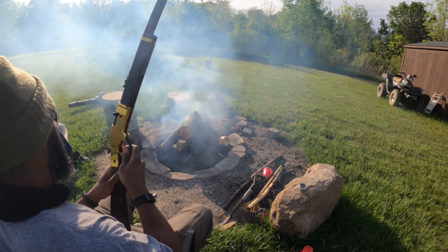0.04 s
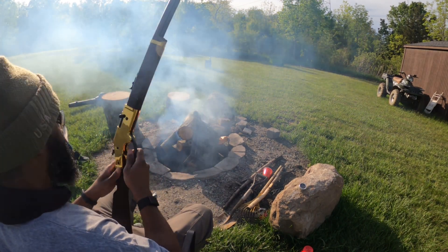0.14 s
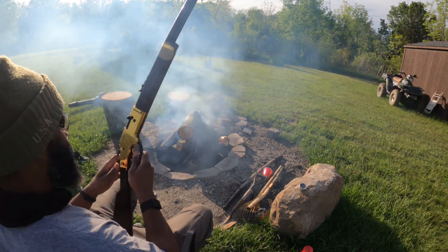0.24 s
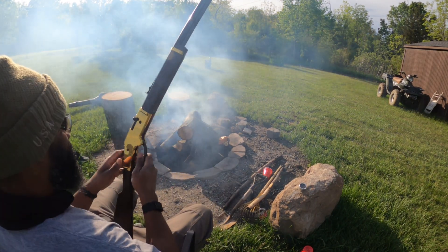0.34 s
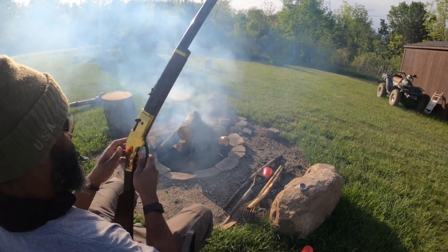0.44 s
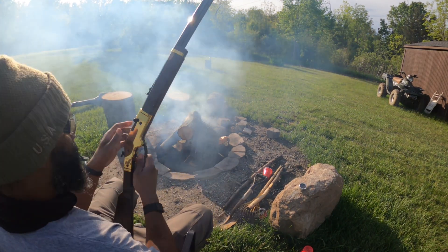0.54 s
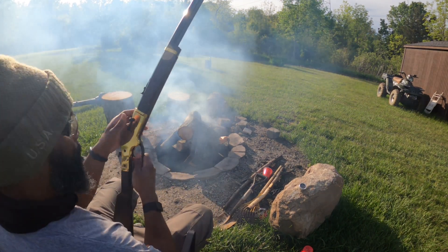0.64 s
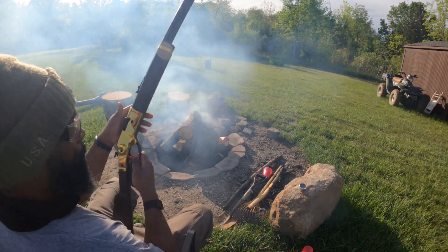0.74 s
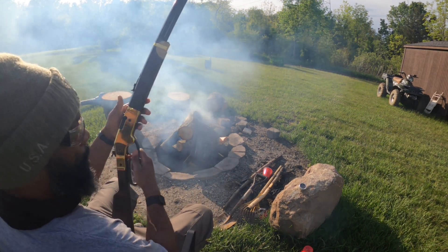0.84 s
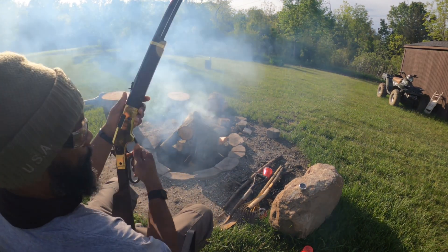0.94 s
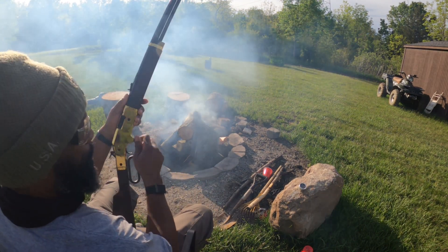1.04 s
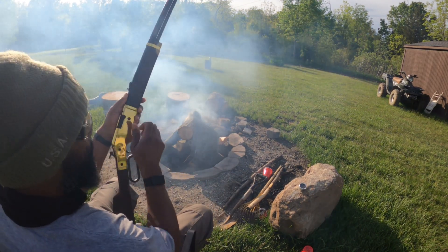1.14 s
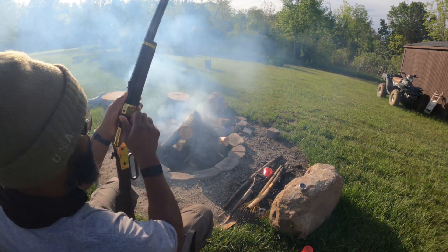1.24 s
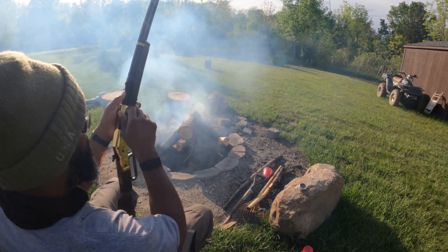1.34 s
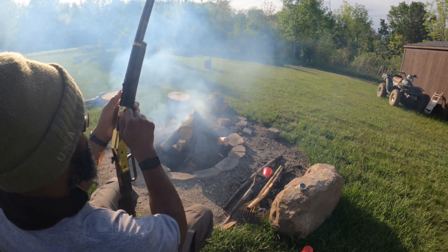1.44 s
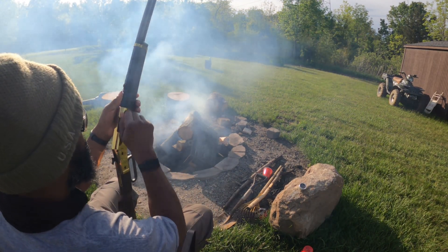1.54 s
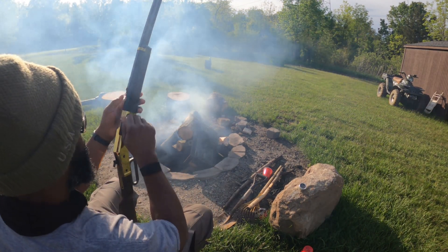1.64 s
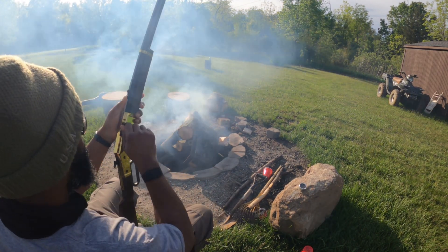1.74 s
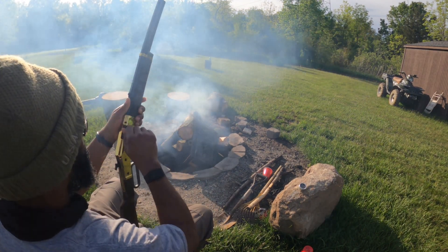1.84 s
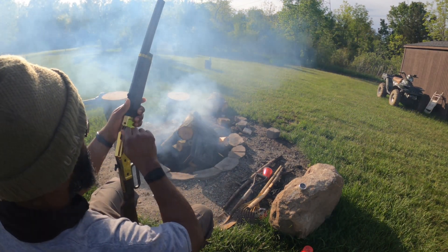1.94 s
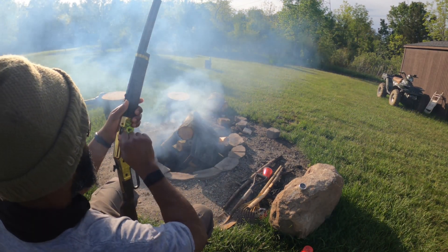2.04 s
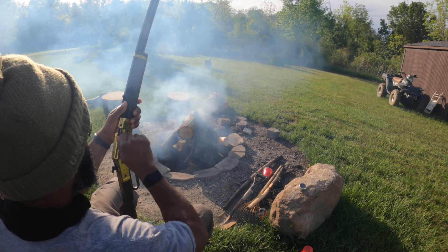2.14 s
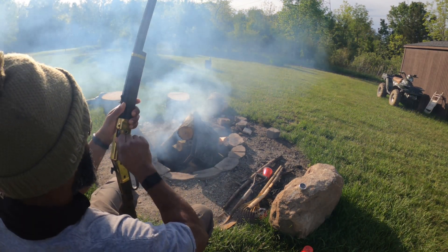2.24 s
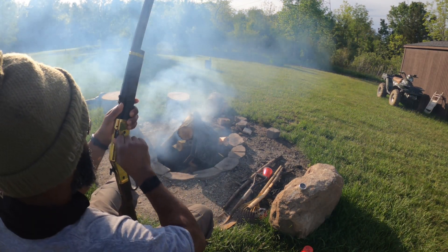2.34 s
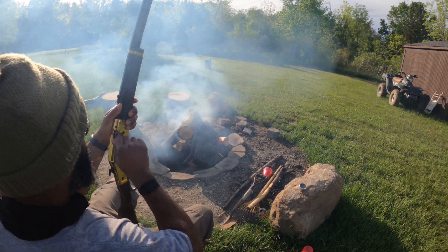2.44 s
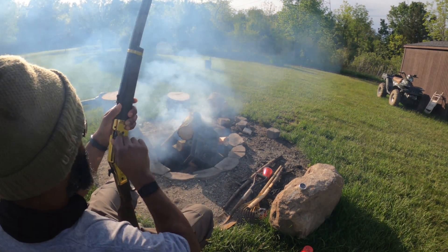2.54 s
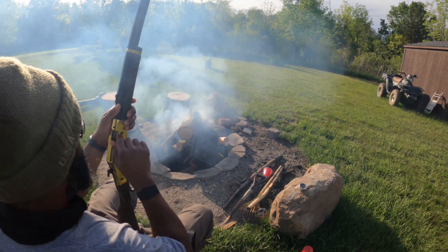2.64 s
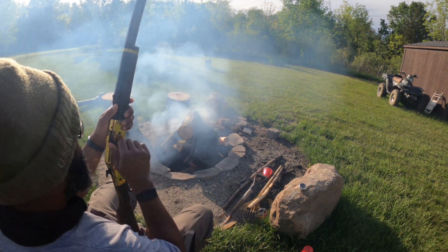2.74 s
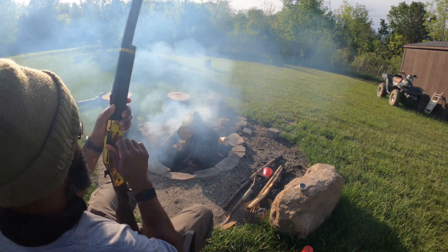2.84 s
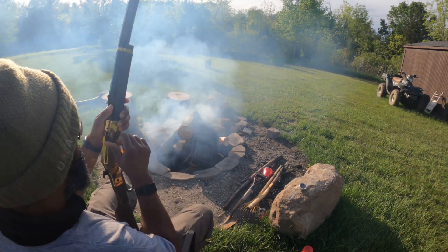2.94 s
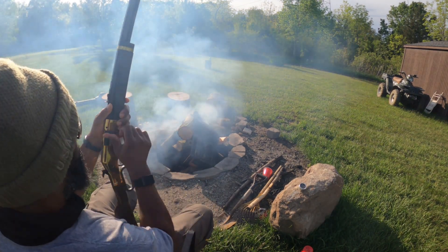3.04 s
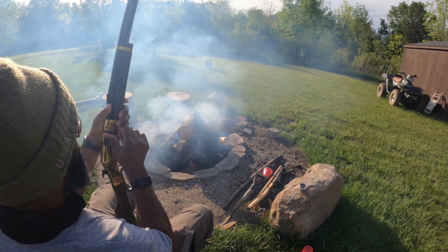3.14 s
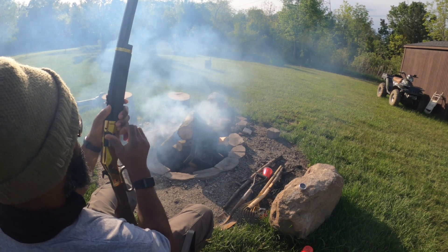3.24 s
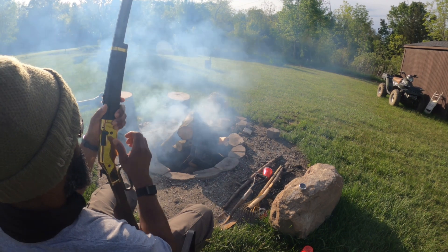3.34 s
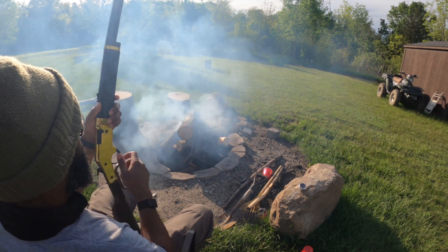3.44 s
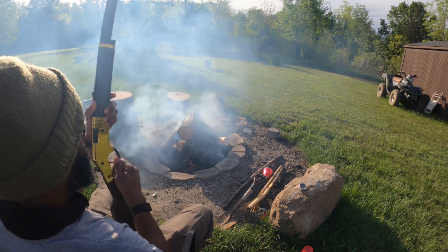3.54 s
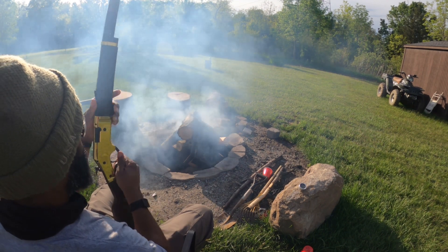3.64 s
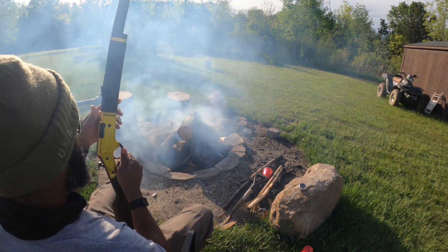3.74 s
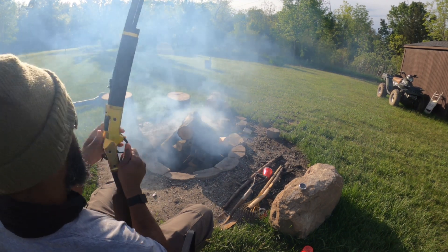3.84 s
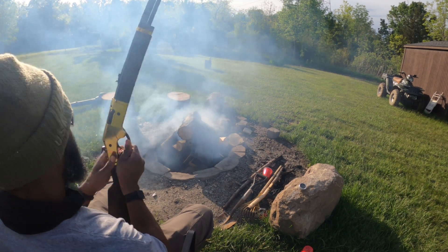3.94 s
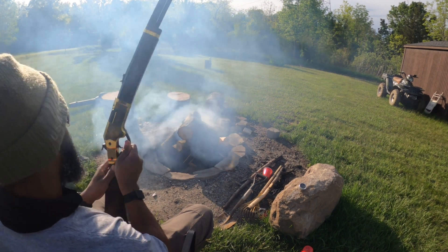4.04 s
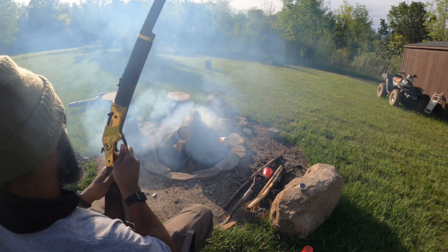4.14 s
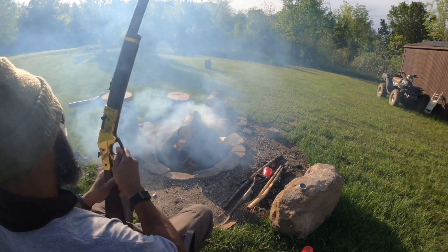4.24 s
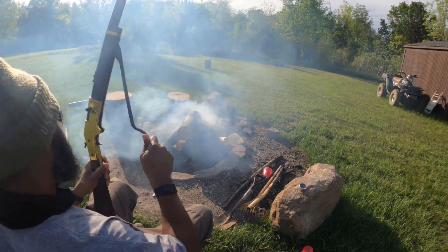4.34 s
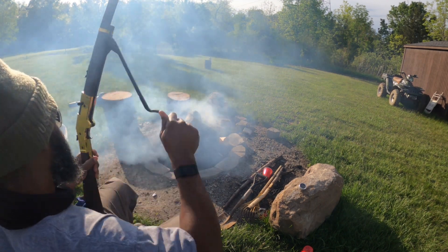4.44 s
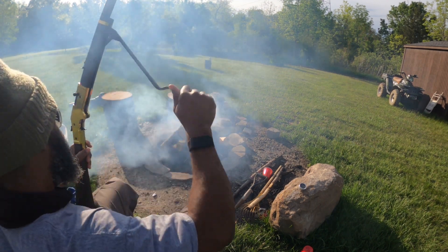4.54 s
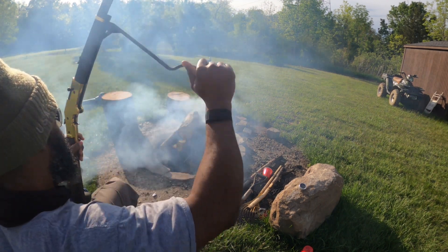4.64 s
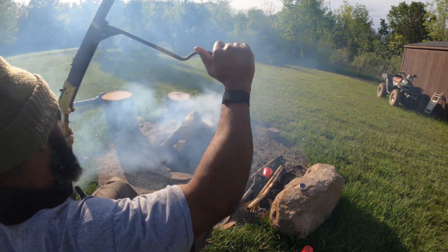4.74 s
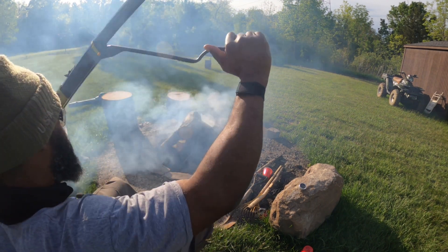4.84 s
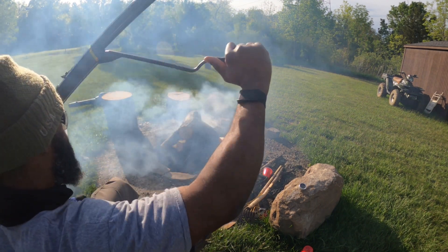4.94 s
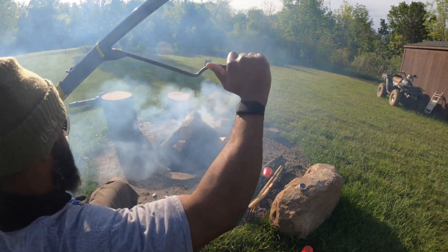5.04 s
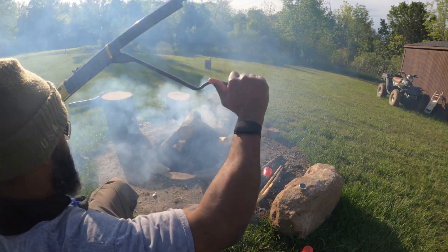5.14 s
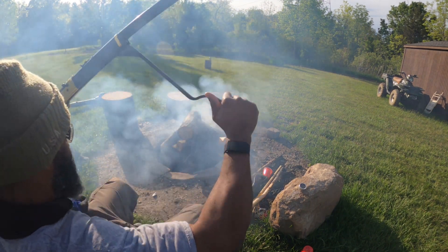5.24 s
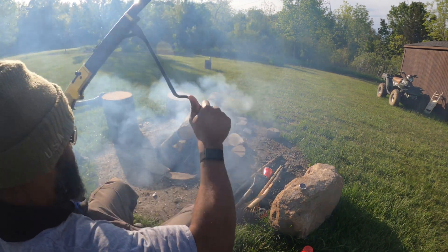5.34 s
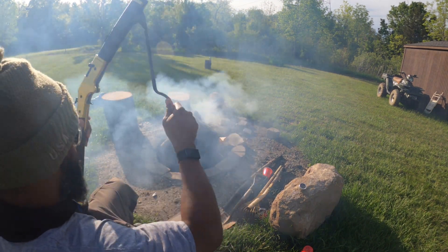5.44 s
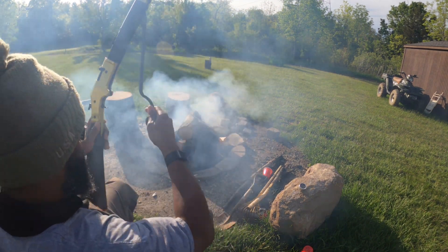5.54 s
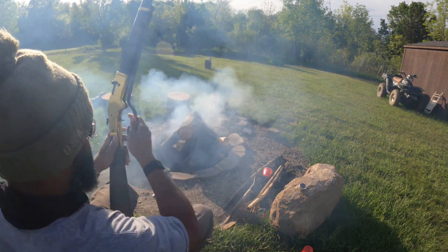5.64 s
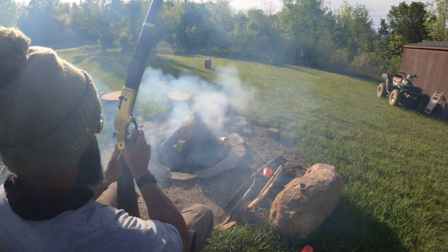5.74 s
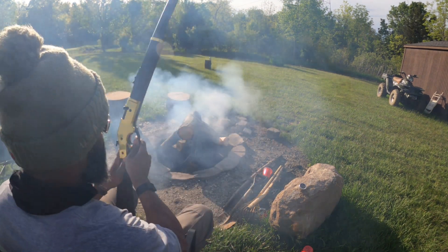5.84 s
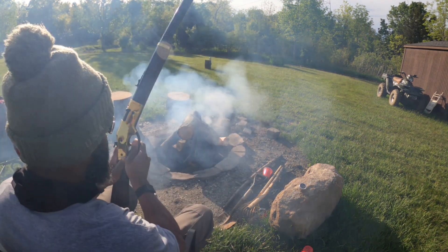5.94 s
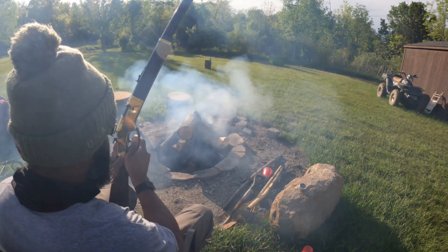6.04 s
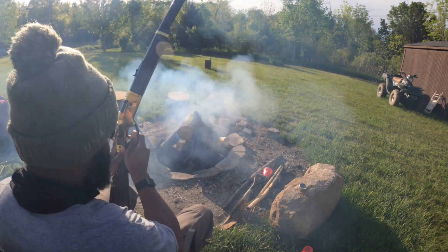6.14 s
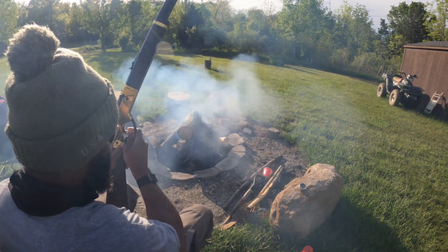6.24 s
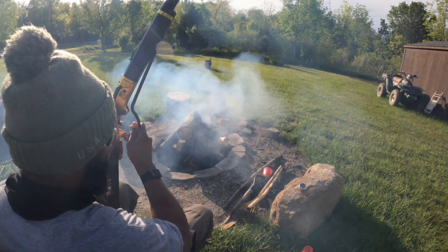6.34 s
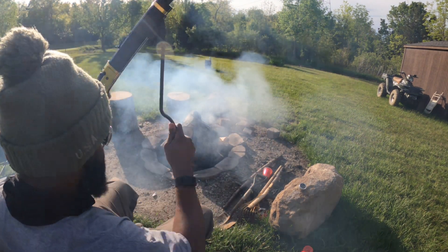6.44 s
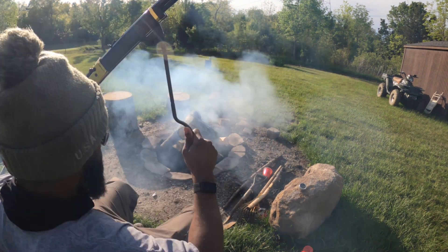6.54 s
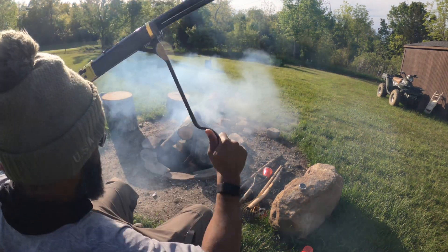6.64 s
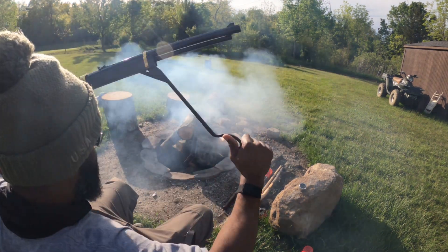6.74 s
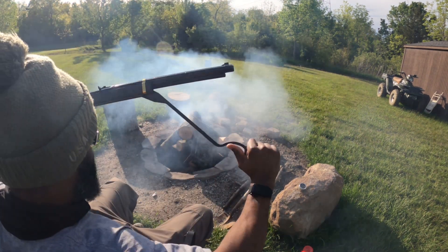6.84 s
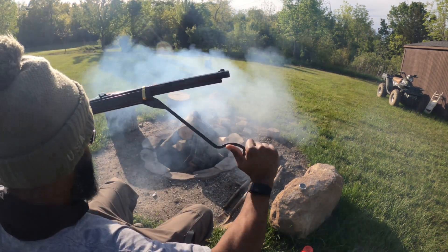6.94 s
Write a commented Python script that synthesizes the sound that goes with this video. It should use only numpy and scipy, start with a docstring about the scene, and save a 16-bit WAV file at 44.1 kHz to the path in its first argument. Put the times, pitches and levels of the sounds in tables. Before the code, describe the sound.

Quiet open lawn with soft low wind on the microphone and distant chirping birds. Very near, hands rub a wooden stock and steel parts tick, scrape and snap in separate bursts. A lever unlatches with a rattle, clacks, and cloth brushes past. A sharp dry crack with a short low air pulse is the loudest event; afterwards, lighter clacks and scrapes as the rifle is cocked again.

```python
"""Lever-action air rifle on a lawn

A lever-action air rifle is loaded, cocked, fired and cocked again close to a camera.
Latches and pump lever clack as noise-struck bodies with ringing modes; the shot adds one low air pulse.
Diffuse noise tails return the gun from the ground and tree line. Shaped noise makes the rubbing hands
and sleeve and the light wind on the microphone; gliding whistles make songbirds far off."""
import sys
import numpy as np
from scipy import signal
from scipy.fft import rfft, irfft, next_fast_len
from scipy.io import wavfile
from scipy.ndimage import uniform_filter1d, map_coordinates

SR = 44100
rng = np.random.default_rng(int(sys.argv[2]) if len(sys.argv) > 2 else 0)


def output_pcm(signal):
    """Save a mono or channel-first signal as 16-bit PCM at the path in sys.argv[1].

    Samples are clipped to [-1, 1] before scaling.
    """
    pcm = np.clip(np.atleast_2d(signal).T, -1, 1) * 32767
    wavfile.write(sys.argv[1], SR, np.round(pcm).astype(np.int16))


N = 308700
TIME = np.arange(N) / SR
AFTER = np.arange(SR // 5) / SR  # seconds since a contact

# wind rumble: time_s, level_db
WIND_LEVEL = [(0, -49.5), (2.6, -52.5), (6.5, -50)]
# wind rumble spectrum: freq_hz, level_db
RUMBLE_SPECTRUM = [(20, -15.5), (55, 2.5), (130, 0.5), (210, -7.5), (330, -21), (800, -62)]
# distant air spectrum: freq_hz, level_db
FIELD_SPECTRUM = [(350, 3.5), (1100, 6), (1700, -8), (2600, -7), (4000, -23.5), (15000, -53.5)]
# sleeve strokes as the arm reaches or works the lever: middle_s, length_s, level_db
SLEEVE_STROKES = [(1.0, 1, -71.5), (1.622, 0.31, -67.5), (3.7, 0.43, -73), (4.48, 0.77, -64),
                  (4.87, 0.31, -63), (5.382, 0.44, -68), (5.849, 0.39, -57), (6.715, 0.38, -66)]
# cloth spectrum: freq_hz, level_db
CLOTH_SPECTRUM = [(400, -12), (1200, 7), (3000, 2.5), (7300, -5), (15500, -37)]
# spring and linkage rattles: start_s, length_s, first_tick_db
RATTLES = [(0.0018, 0.047, -40.5), (0.077, 0.019, -40.5), (0.124, 0.058, -53.5), (1.798, 0.061, -50),
           (2.119, 0.064, -46), (2.967, 0.1, -45), (4.038, 0.048, -56.5), (4.4085, 0.011, -46.5),
           (4.4458, 0.052, -36.5), (4.4708, 0.034, -35.5), (4.529, 0.008, -52), (4.94, 0.068, -49),
           (6.806, 0.008, -58)]
# near bird's syllables: start_s, length_s, level_db, glide_pitches_hz
SYLLABLES = [(0.31, 0.11, -74.5, (2520, 2500)), (0.437, 0.118, -61.5, (3400, 2520, 3250)),
             (0.797, 0.045, -65.5, (3500, 1800)), (0.912, 0.09, -67.5, (2250, 2170, 2550)),
             (1.026, 0.089, -63, (2040, 2530, 3500)), (1.193, 0.056, -66, (3500, 3340, 3040)),
             (1.3, 0.09, -65.5, (2500, 2630, 3250)), (1.39, 0.045, -64, (2470, 2330)),
             (1.538, 0.053, -64, (3240, 3520)), (1.586, 0.12, -66, (3350, 2950, 2990, 2200)),
             (1.874, 0.05, -65.5, (3200, 1900)), (2.277, 0.045, -69.5, (2450, 3300)),
             (2.355, 0.083, -65.5, (3400, 2460, 3250)), (3.551, 0.12, -72, (2600, 1920)),
             (3.73, 0.099, -76, (3200, 3350)), (3.911, 0.077, -67.5, (3430, 2950)),
             (4.646, 0.08, -67.5, (2600, 2790, 2560)), (5.248, 0.24, -72, (2300, 2740, 2200))]
# palm rubs on the wooden stock: start_s, fall_s, level_db
PALM_RUBS = [(0.438, 0.59, -64), (1.663, 0.08, -59.5), (2.476, 0.043, -50), (2.905, 0.031, -55),
             (3.946, 0.14, -60), (5.07, 0.029, -55)]
# taps of small steel parts: start_s, pitch_hz, level_db
CLINKS = [(1.096, 3400, -56.5), (1.938, 4080, -57), (2.989, 4090, -37), (3.188, 4150, -62),
          (5.758, 3080, -53)]
# blows of breech, lever and piston: start_s, knock_pitch_hz, strength_db,
# hardness_db (high = steel snap, low = wooden knock)
BLOWS = [(1.7434, 1560, -57.5, -10.5), (1.757, 1370, -33.5, 0), (1.7729, 1400, -24, 2),
         (1.7755, 1285, -27.5, 4.5), (2.0056, 1550, -34, 2.5), (2.036, 1610, -39, 3),
         (2.0763, 1250, -21, 0.5), (2.6002, 1160, -39, -7), (2.627, 1374, -49.5, -10),
         (3.0142, 1960, -36, 5), (3.0341, 1268, -32, -9), (3.0396, 1690, -22.5, 2.5),
         (3.0566, 1630, -29.5, -2.5), (4.2683, 1847, -39, 3), (4.307, 1136, -23.5, -3.5),
         (4.3705, 1350, -39.5, 8.5), (4.388, 1490, -37, -2), (4.8986, 1940, -29.5, 2),
         (4.937, 1470, -37.5, 1.5), (5.72, 1072, -17, 6.5), (5.7265, 1230, -14, 4),
         (6.3758, 2070, -31.5, -2.5), (6.3762, 3030, -36, -4), (6.4485, 1410, -35, 3),
         (6.4808, 1520, -43, -7), (6.8573, 1357, -33.5, -3), (6.8902, 1710, -49.5, -7),
         (6.933, 1415, -57, -5)]
# metal sliding on metal: start_s, length_s, level_db
SCRAPES = [(1.748, 0.057, -43), (2.017, 0.072, -46), (2.944, 0.13, -56.5), (4.363, 0.054, -46.5),
           (4.898, 0.027, -39), (5.702, 0.025, -42.5), (6.381, 0.14, -57.5), (6.617, 0.018, -59),
           (6.689, 0.04, -60.5), (6.766, 0.018, -60), (6.817, 0.024, -56.5), (6.851, 0.026, -46)]
# spectra of the struck bodies: freq_hz, level_db
THUD_SPECTRUM = [(60, -24), (330, -15), (620, 1.5), (900, 5), (2000, -39.5)]
STOCK_SPECTRUM = [(150, -46), (850, -15), (1080, 3.5), (2100, -3), (2900, -20), (6000, -57)]
RECEIVER_SPECTRUM = [(900, -55.5), (1700, -6), (3000, -0.5), (5000, -10.5), (7500, -43.5)]
STEEL_SPECTRUM = [(2500, -20), (4500, -1), (7600, -3), (9000, -11.5), (16000, -33.5)]
SPRING_SPECTRUM = [(600, -24.5), (2600, 0.5), (3700, 5.5), (7600, -3.5), (9500, -15.5), (15500, -26)]
# ringing modes of the metalwork: mode_hz, level_db
METAL_MODES = [(1230, 0.5), (2020, -4.5), (2960, 4.5), (3690, -0.5), (4080, -1.5), (4810, 1), (5700, -2.5),
               (6490, -2)]
# tree line's answer: delay_s, relative_level_db
TREE_ECHO = [(0.08, -40.5), (.13, -3.5), (.24, 1.5), (0.449, -34)]

SHOT_S = 5.7295
GUST_DB, FIELD_DB = -65.5, -65.5
RESTING_CLOTH_DB = -80.5  # between strokes
CONTACT_RISE_S = 0.0007  # build-up of contact force
TICK_GAP_MEDIAN_S, RATTLE_FALL_DB = 0.008, 19.5  # fall over a rattle's length
FAR_BIRDS_DB, FAR_LOWER_MAX = -77.5, 0.22  # far pitches drop by up to this share
RUB_ATTACK_S = 0.0086
CLINK_OVERTONE_RATIO = 1.2
CLACK_DB, SNAP_DB = -2.5, -11.5  # receiver and steel against a blow's strength
LEAD_IN_S, LEAD_IN_DB = 0.0035, -25  # faint copy just ahead of each blow, softening its attack
REBOUND_MEDIAN_S, REBOUND_DB = 0.009, -17.5  # part springs back and lands again
GRIP_UNTIL_S = 4.0
GRIPPED_THUD_DB, FREE_THUD_DB = -47, -15  # hand round the receiver damps the thud while loading
PART_HZ = 1480  # a part knocking here shares the metalwork's modes
DUCK_THRESHOLD_DB, RECOVERY_DB_PER_S = -22.5, 8
ROLLOFF_HZ, TOP_HZ = 14800, 15800


def amp(db):
    """Decibels to gain."""
    return 10 ** (np.asarray(db) / 20)


def unit(x):
    """x at rms 1."""
    return x / np.sqrt(np.mean(x ** 2) + 1e-20)


def along(points, hz):
    """Interpolate (freq_hz, value) points on a log frequency axis."""
    f, v = np.transpose(points)
    return np.interp(np.log(hz + 1), np.log(f), v)


def curve(rows, t=TIME):
    """Join (time_s, value) rows by straight lines."""
    return np.interp(t, *np.transpose(rows))


def wobble(rate_hz):
    """Smooth random curve, rate_hz knots a second."""
    knots = rng.standard_normal(int(N * rate_hz / SR) + 4)
    return map_coordinates(knots, [TIME * rate_hz])


def fade(t60):
    """Exponential decay of a struck part, 60 dB in t60 seconds."""
    return 1000 ** (-AFTER / t60)


def add(track, s, sound):
    """Mix a sound into a track from time s."""
    part = track[..., max(round(s * SR), 0):][..., :sound.shape[-1]]
    part += sound[..., :part.shape[-1]]


def filtered(x, response):
    """Multiply the spectrum of x by a response of frequency."""
    m = next_fast_len(N + SR // 2)
    hz = np.fft.rfftfreq(m, 1 / SR)
    return irfft(rfft(x, m) * response(hz), m)[..., :N]


def causal(points, size=2048):
    """Minimum-phase impulse response of a body with this spectrum, by folding its cepstrum."""
    hz = np.fft.rfftfreq(size, 1 / SR)
    cepstrum = irfft(np.log(amp(along(points, hz))))
    cepstrum[1:size // 2] *= 2
    cepstrum[size // 2 + 1:] = 0
    return irfft(np.exp(rfft(cepstrum)))


def punch(x):
    """x at rms 1 over its first 4 ms."""
    return x / np.sqrt(np.mean(x[:round(.004 * SR)] ** 2))


def contact(body, t60, tail_db, tail_t60, apart):
    """A hard contact strikes a body once, then chatters; its weak tail differs between the ports."""
    noise = rng.standard_normal((3, len(AFTER)))
    rise = 1 - np.exp(-AFTER / CONTACT_RISE_S)
    force = noise[0] * rise * fade(t60)
    force[round(CONTACT_RISE_S * SR)] += 4  # the strike
    direct = punch(signal.fftconvolve(force, body)[:len(AFTER)])
    kernel = body[None] / np.linalg.norm(body)
    mid, side = rise * signal.fftconvolve(noise[1:], kernel, axes=1)[:, :len(AFTER)]
    tail = amp(tail_db) * fade(tail_t60)
    centre = direct + mid * tail
    width = side * (apart * fade(t60) + tail / 2)
    return np.array([centre + width, centre - width])


def ring(t60, scale=1):
    """Decaying metalwork modes, newly weighted each call; a smaller part rings higher."""
    hz, db = np.transpose(METAL_MODES)[..., None]
    strength, phase_cycles = rng.standard_normal((2, len(METAL_MODES), 1))
    modes = amp(db + 2 * strength) * np.sin(2 * np.pi * (scale * hz * AFTER + phase_cycles))
    return fade(t60) * np.sum(modes, axis=0)


def rush(spectrum, side_db):
    """Stereo noise of rms 1 with a given colour and width."""
    noise = rng.standard_normal((2, N))
    mid, side = filtered(noise, lambda hz: amp(along(spectrum, hz)))
    width = amp(side_db) * side
    return unit(np.array([mid + width, mid - width]))


def echo(x, shape):
    """Diffuse scatter: a noise tail whose level follows (delay_s, relative_level_db) points."""
    t = np.arange(SR) / SR
    tail = rng.standard_normal((2, SR)) * amp(curve(shape, t)) * (t < shape[-1][0])
    return signal.fftconvolve(x[None], tail / np.linalg.norm(tail[0]), axes=1)[:, :N]


def outdoors():
    """Wind rumbles and buffets as wavering low noise over the soft rush of the open field."""
    rumble = amp(curve(WIND_LEVEL) + 1.3 * wobble(8)) * rush(RUMBLE_SPECTRUM, side_db=-15)
    # slow lumps of air on the ports
    gusts = unit(amp(4.8 * wobble(6.2)) * rush([(70, 3.0), (800, -81.5)], side_db=-8.5))
    field = rush(FIELD_SPECTRUM, side_db=-8.5)
    return rumble + amp(GUST_DB) * gusts + amp(FIELD_DB) * field


def sleeve():
    """Cloth slides over the gun in uneven noise grains; each stroke swells and ebbs."""
    motion = amp(RESTING_CLOTH_DB)
    for middle_s, length_s, db in SLEEVE_STROKES:
        motion = motion + amp(db) * np.exp(-2 * (2 * (TIME - middle_s) / length_s) ** 2)
    grain = unit(amp(2.4 * wobble(34) + 2.2 * wobble(300)))
    return motion * grain * rush(CLOTH_SPECTRUM, side_db=-5.5)


def tick(spring):
    """A light contact on the spring."""
    return contact(spring, t60=0.02, tail_db=-6.0, tail_t60=0.093, apart=0.33)


def linkage(count=11):
    """Spring and lever pivots slip in uneven runs of small bright ticks that ring and die away."""
    out = np.zeros((2, N))
    spring = causal(SPRING_SPECTRUM)
    for s, length_s, db in RATTLES:
        gaps_s = TICK_GAP_MEDIAN_S * np.exp(rng.normal(0, 0.32, count))
        ringing = amp(-15.5) * ring(t60=0.051)
        for delay_s in np.cumsum(gaps_s) - gaps_s[0]:
            if delay_s < length_s:
                level = amp(db - RATTLE_FALL_DB * delay_s / length_s)
                add(out, s + delay_s, level * (tick(spring) + ringing))
    return out


def syllable(length_s, pitches_hz):
    """A whistle that glides through its pitches with a rough quaver."""
    u = np.linspace(0, 1, round(length_s * SR))
    degree = len(pitches_hz) - 1
    glide = np.polyfit(np.linspace(0, 1, len(pitches_hz)), pitches_hz, degree)
    hz = np.polyval(glide, u)
    quaver = .016 * unit(uniform_filter1d(rng.standard_normal(len(u)), size=130))
    swell = np.sqrt(np.abs(np.sin(np.pi * u)))
    return swell * np.sin(2 * np.pi * np.cumsum(hz * (1 + quaver)) / SR)


def bird(count=70):
    """One bird whistles, others faintly and lower until the shot; song flutters and scatters off trees."""
    near, far = np.zeros((2, N))
    for s, length_s, db, pitches_hz in SYLLABLES:
        add(near, s, amp(db) * syllable(length_s, pitches_hz))
    for when, pick, shift in rng.random((count, 3)):
        _, length_s, _, pitches_hz = SYLLABLES[int(pick * len(SYLLABLES))]
        lowered_hz = np.multiply(pitches_hz, 1 - FAR_LOWER_MAX * shift)
        add(far, when * SHOT_S, syllable(length_s, lowered_hz))
    song = amp(3 * wobble(100)) * (near + amp(FAR_BIRDS_DB) * far)
    return song + echo(song, [(0, 0), (.07, -12), (.6, -36)])


def palm():
    """Skin grips the stock and drags to rest: grainy noise through the stock and receiver."""
    pressure = np.zeros(N)
    for s, fall_s, db in PALM_RUBS:
        peak_s = s + RUB_ATTACK_S
        pressure += amp(db) * curve([(s, 0), (peak_s, 1), (peak_s + fall_s, 0)])
    slips = amp(2.16 * wobble(120)) * rng.standard_normal(N)
    wood = signal.fftconvolve(slips, causal(STOCK_SPECTRUM))[:N]
    metal = signal.fftconvolve(slips, causal(RECEIVER_SPECTRUM))[:N]
    return pressure * unit(wood + amp(-9.0) * metal)


def clinks():
    """A small steel part is tapped and rings briefly in two modes."""
    out = np.zeros((2, N))
    spring = causal(SPRING_SPECTRUM)
    for s, hz, db in CLINKS:
        phase = 2 * np.pi * hz * AFTER
        tone = (np.sin(phase) + .5 * np.sin(CLINK_OVERTONE_RATIO * phase)) * fade(t60=0.055)
        add(out, s, amp(db) * (tone + amp(-5) * tick(spring)))
    return out


def action():
    """Each blow knocks the stock, clacks in the receiver and snaps on ringing steel, then rebounds."""
    out = np.zeros((2, N))
    spectra = (STOCK_SPECTRUM, THUD_SPECTRUM, RECEIVER_SPECTRUM, STEEL_SPECTRUM)
    stock, thud, receiver, steel = map(causal, spectra)
    for s, hz, db, hardness_db in BLOWS:
        tone = punch(np.sin(2 * np.pi * hz * AFTER) * fade(t60=0.016) * (1 - fade(t60=0.012)))
        thud_db = GRIPPED_THUD_DB if s < GRIP_UNTIL_S else FREE_THUD_DB
        rebound_s = REBOUND_MEDIAN_S * np.exp(rng.normal(0, 0.22))
        for delay_s, loss_db in ((-LEAD_IN_S, LEAD_IN_DB), (0, 0), (rebound_s, REBOUND_DB)):
            knock = tone + .45 * contact(stock, t60=.026, tail_db=-12, tail_t60=.08, apart=.1)
            add(knock, 0, amp(thud_db) * punch(thud))
            clack = contact(receiver, t60=0.021, tail_db=-17.0, tail_t60=0.12, apart=0.23)
            clack += amp(-22) * ring(t60=0.043)
            snap = contact(steel, t60=0.02, tail_db=-15.5, tail_t60=0.09, apart=0.68)
            snap += amp(-14) * ring(t60=0.032, scale=hz / PART_HZ)
            blow = amp(-hardness_db) * knock + amp(CLACK_DB) * clack + amp(SNAP_DB + hardness_db) * snap
            add(out, s + delay_s, amp(db + loss_db) * blow)
    return out


def scrapes():
    """Sliding parts catch and slip: dense rough noise sounds the stock, spring and metalwork modes."""
    stroke = np.zeros(N)
    for s, length_s, db in SCRAPES:
        add(stroke, s, amp(db) * signal.windows.tukey(round(length_s * SR), .5))
    slips = stroke * unit(amp(4 * wobble(320)) * rng.standard_normal(N))
    bodies = (causal(STOCK_SPECTRUM), causal(SPRING_SPECTRUM), ring(t60=0.045))
    wood, metal, modes = (signal.fftconvolve(slips, b / np.linalg.norm(b))[:N] for b in bodies)
    return amp(4.0) * wood + amp(-3.5) * metal + amp(-6.0) * modes


def muzzle():
    """The released air pushes one low pulse into the right-hand port."""
    u = AFTER / 0.004
    onset = 1 - np.exp(-(AFTER / 0.002) ** 2)
    out = np.zeros((2, N))
    add(out[1], SHOT_S, amp(-2.0) * (1 - u) * np.exp(-u) * onset)
    return out


def port_lean(hz):
    """The ports favour the left in the mids and the right in the treble."""
    left_over_right_db = along([(700, 0.0), (3000, 3.5), (9000, -4.0)], hz)
    return amp(np.array([[.5], [-.5]]) * left_over_right_db)


def scene():
    """The gun, its scatter off the ground and the trees, and the surroundings."""
    gun = linkage() + palm() + clinks() + action() + scrapes()
    gun_mono = gun.mean(0)
    ground = amp(-18.5) * echo(gun_mono, [(0, 9), (.22, -55.5)])
    trees = filtered(echo(gun_mono, TREE_ECHO), lambda hz: amp(along([(1200, -35.0), (9000, -42.5)], hz)))
    return outdoors() + sleeve() + bird() + filtered(gun + ground + trees, port_lean) + muzzle()


def record(dry):
    """The camera ducks on the loudest peaks, recovers slowly and rolls off at its band limit."""
    power = uniform_filter1d(dry.mean(0) ** 2, size=660)  # 15 ms
    level_db = 10 * np.log10(np.abs(power) + 1e-12)
    excess_db = np.maximum(level_db - DUCK_THRESHOLD_DB, 0)
    recovery_db = RECOVERY_DB_PER_S * TIME
    duck_db = np.maximum.accumulate(excess_db + recovery_db) - recovery_db
    duck_db = signal.lfilter([1 / 900], [1, 1 / 900 - 1], duck_db)  # 20 ms smoothing
    return filtered(dry * amp(-duck_db), lambda hz: (hz < TOP_HZ) / (1 + (hz / ROLLOFF_HZ) ** 20))


dry = scene()
out = record(dry)
output_pcm(out)
```